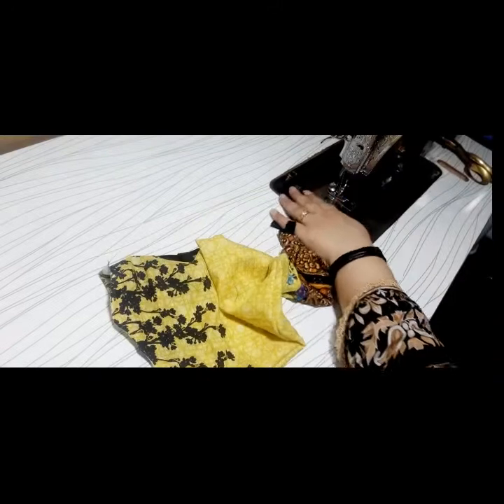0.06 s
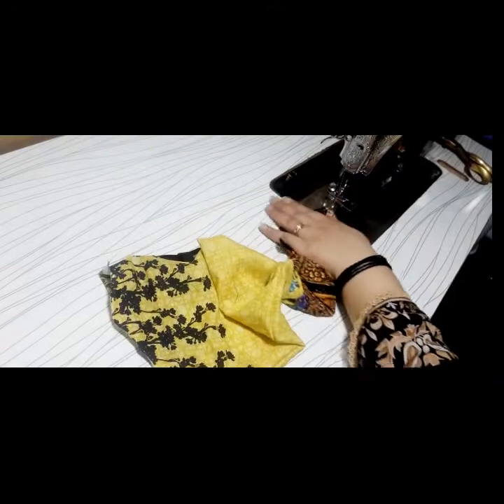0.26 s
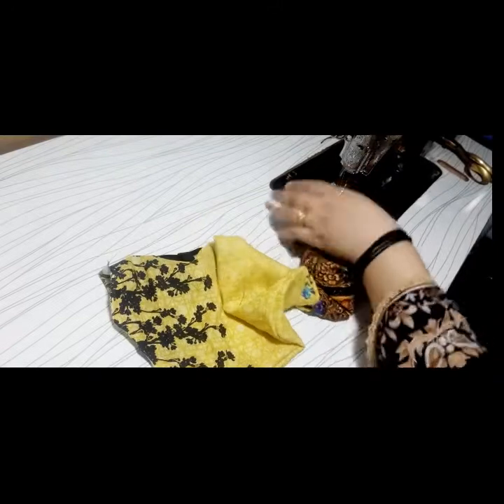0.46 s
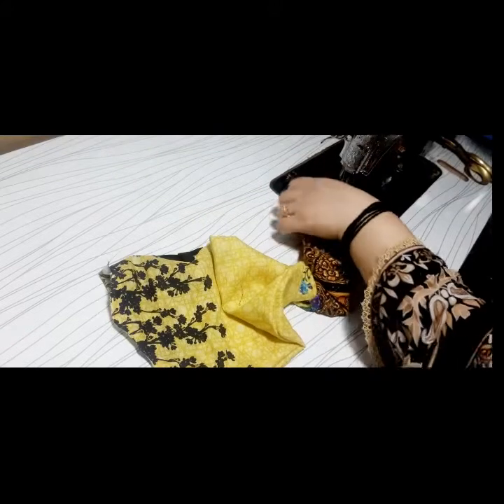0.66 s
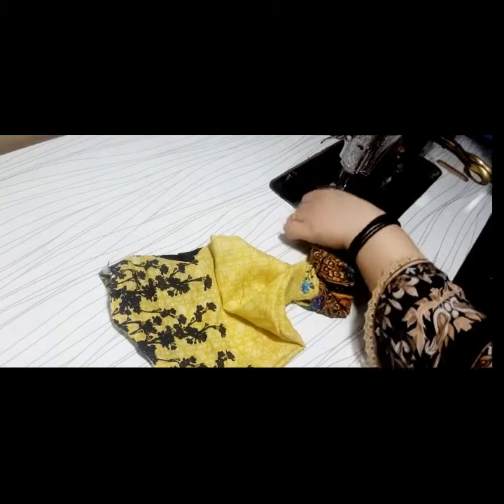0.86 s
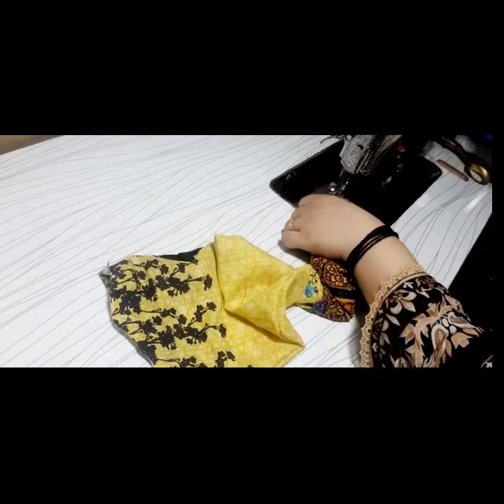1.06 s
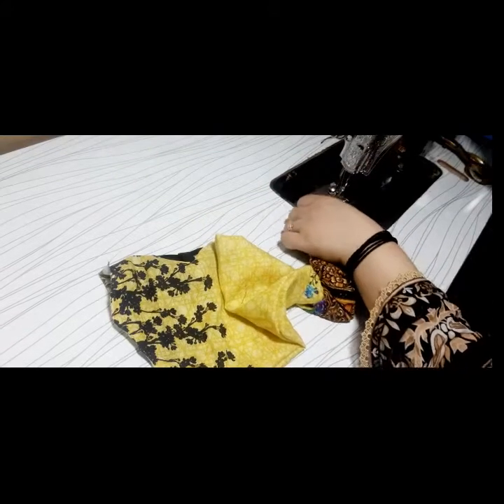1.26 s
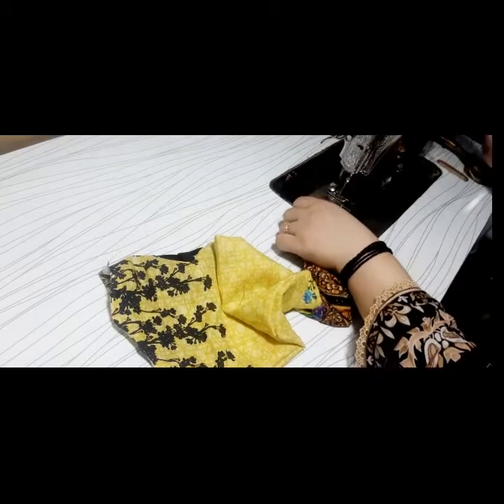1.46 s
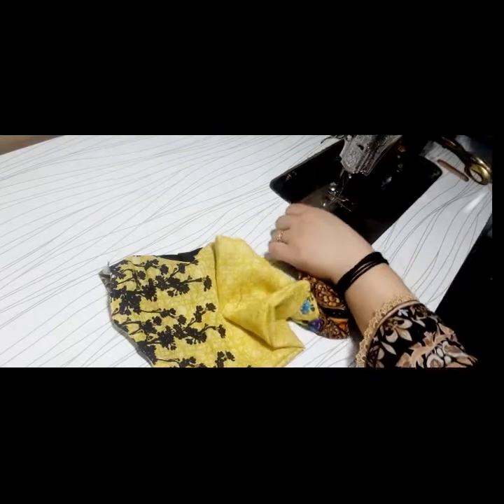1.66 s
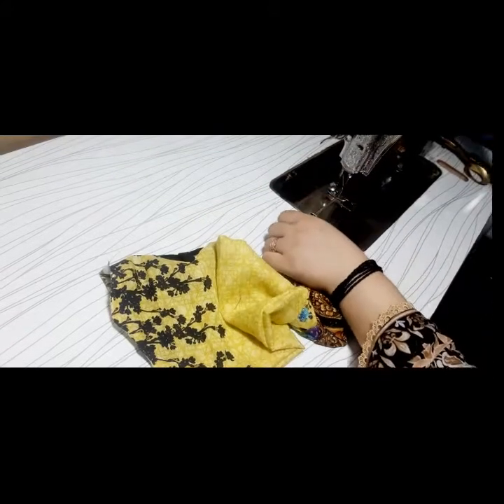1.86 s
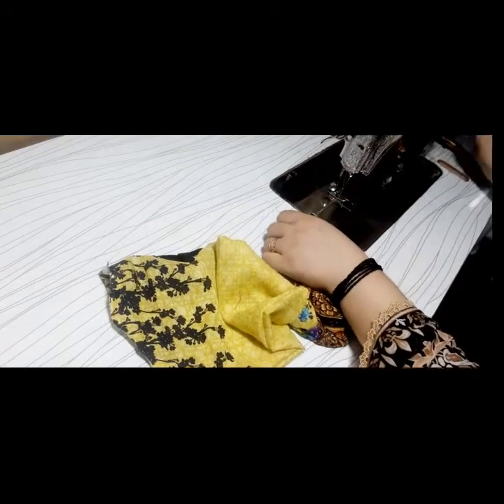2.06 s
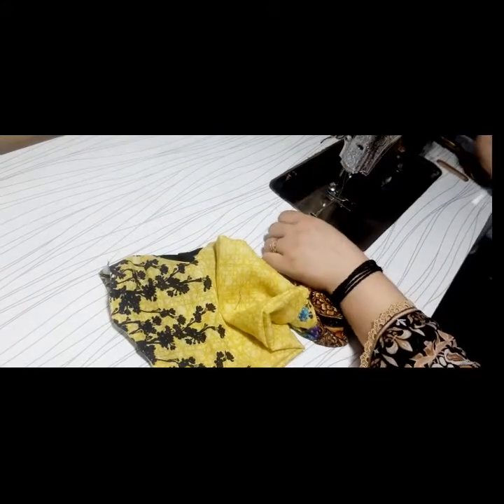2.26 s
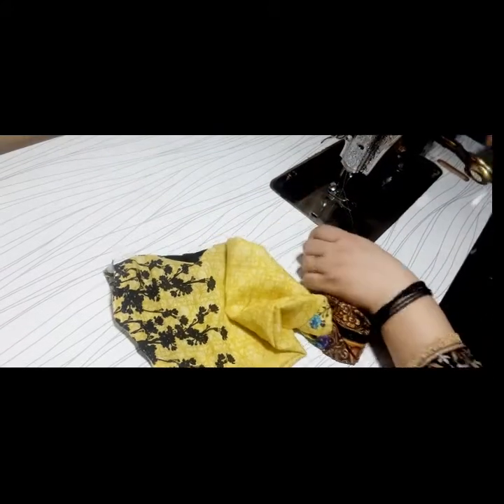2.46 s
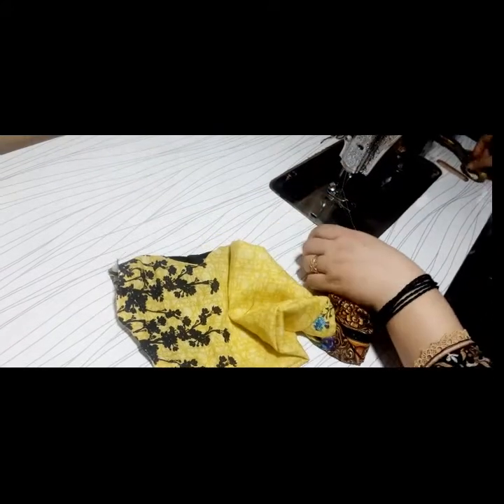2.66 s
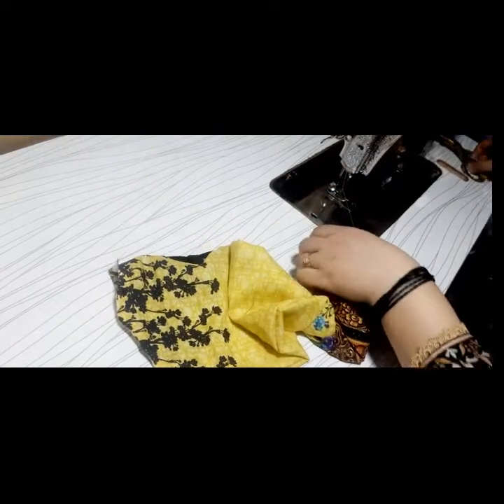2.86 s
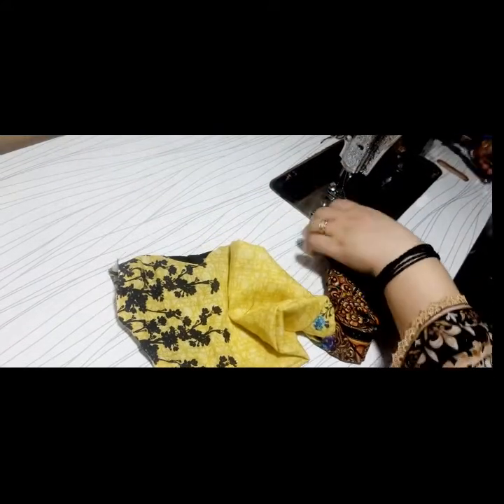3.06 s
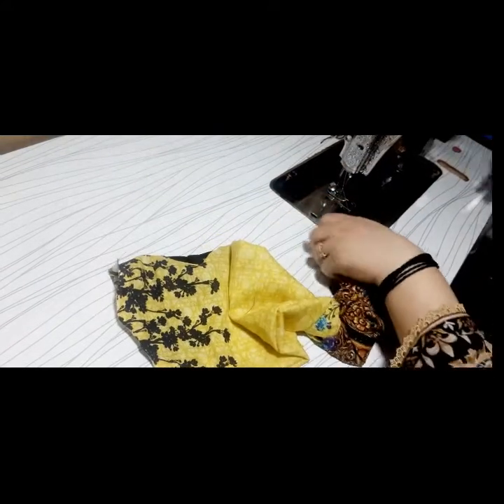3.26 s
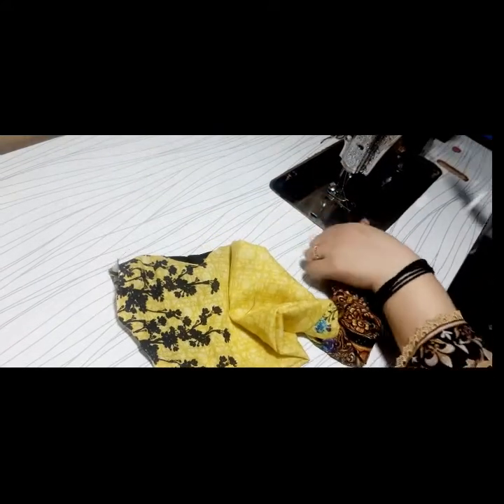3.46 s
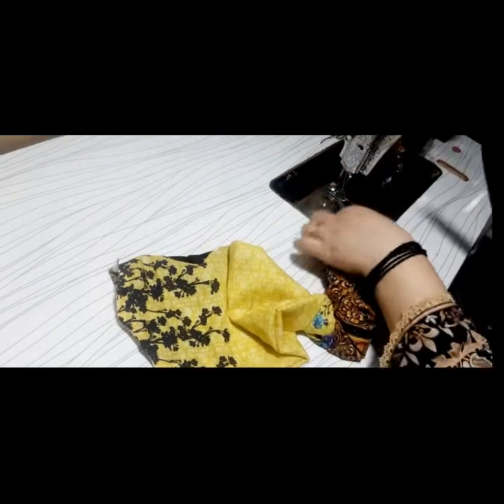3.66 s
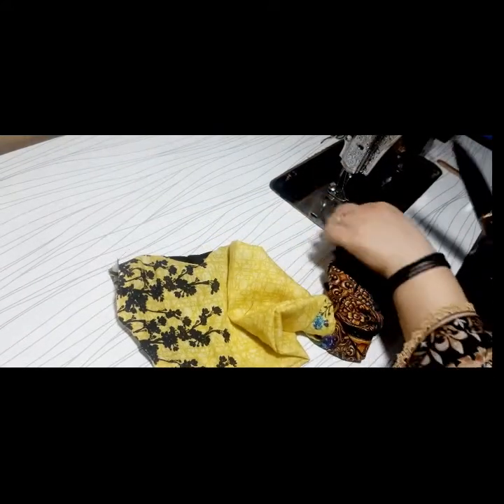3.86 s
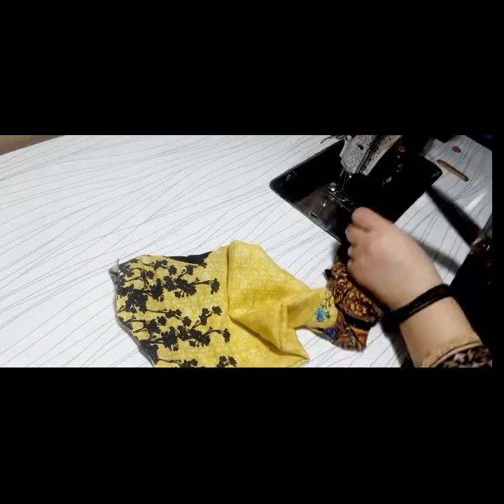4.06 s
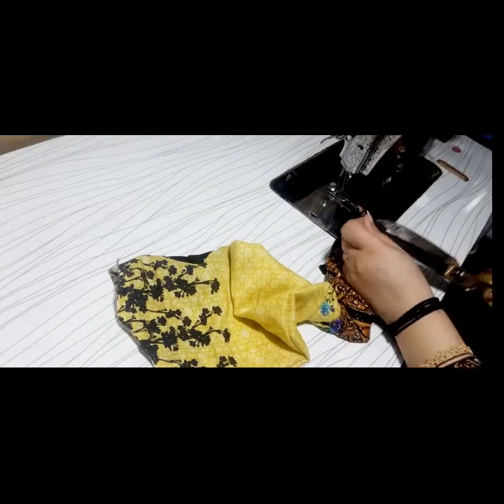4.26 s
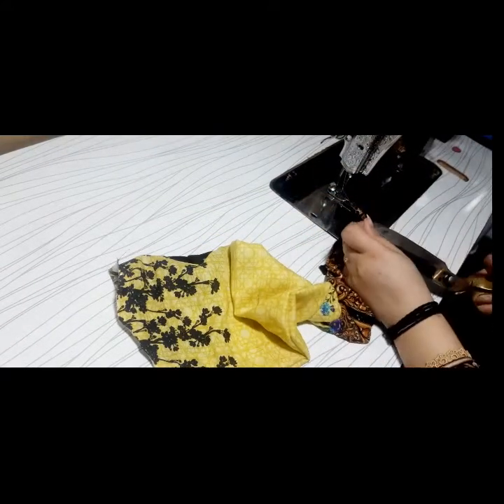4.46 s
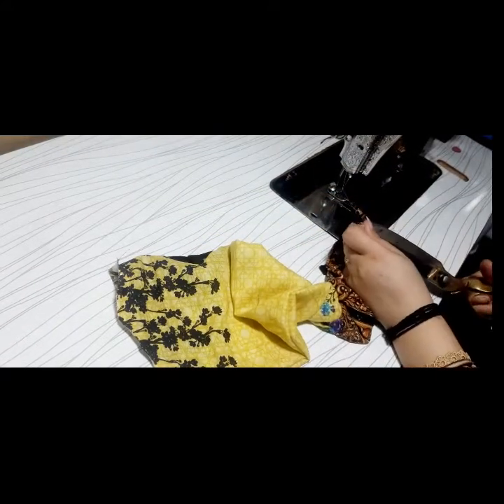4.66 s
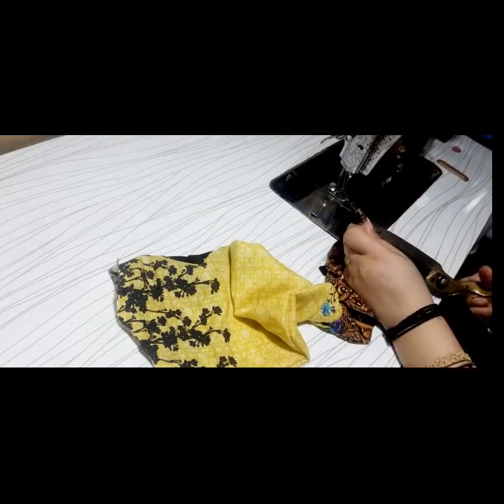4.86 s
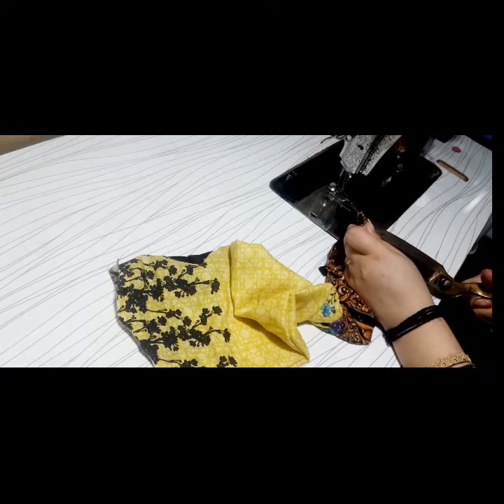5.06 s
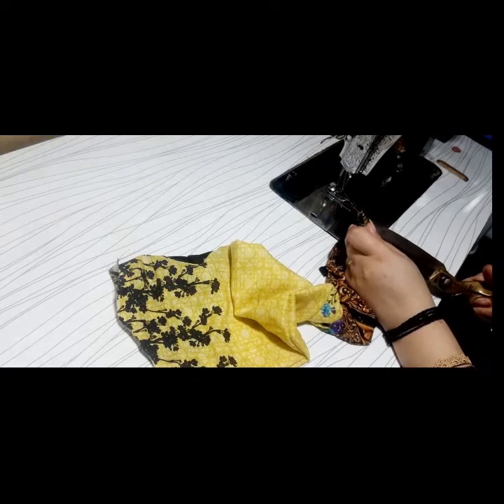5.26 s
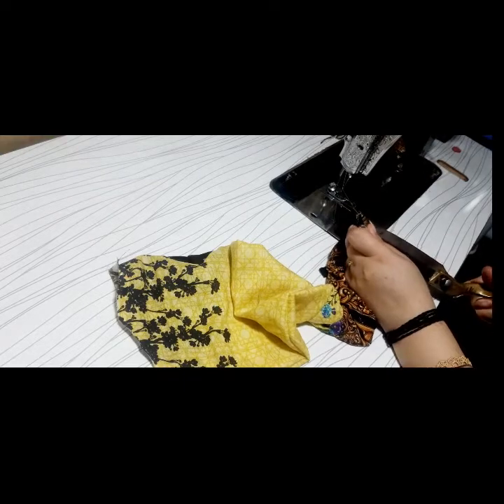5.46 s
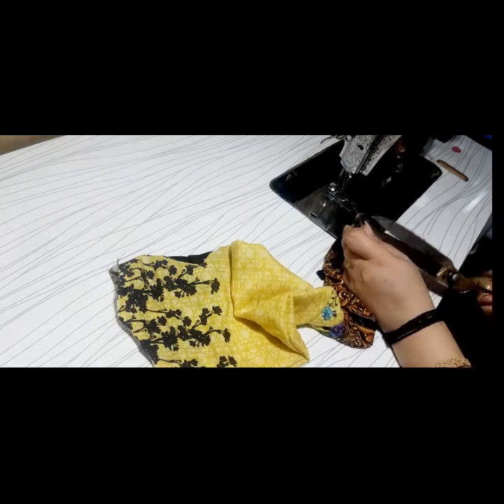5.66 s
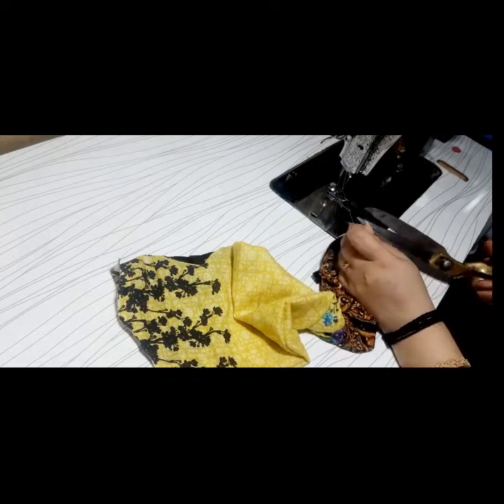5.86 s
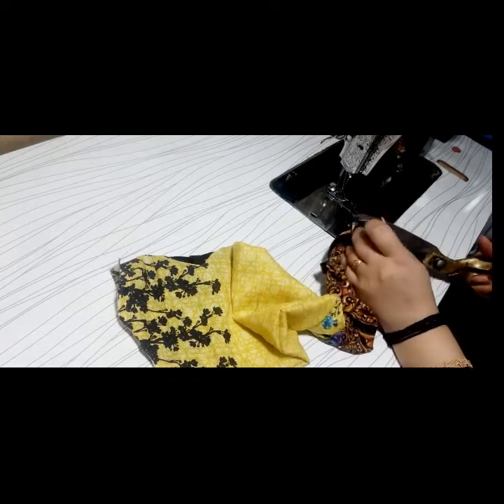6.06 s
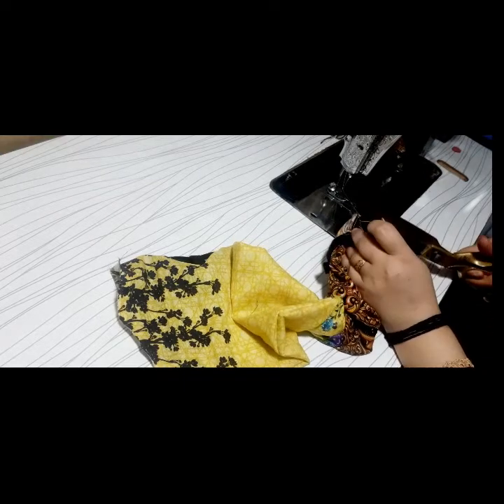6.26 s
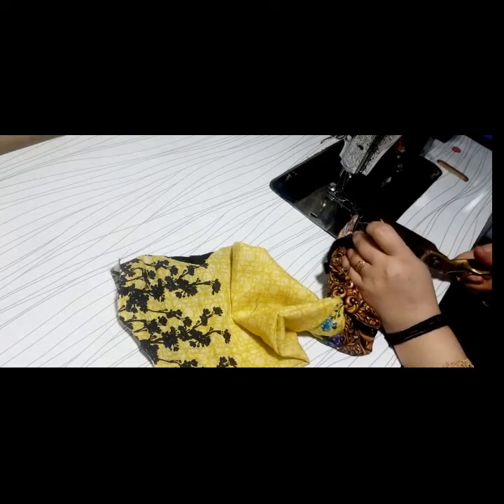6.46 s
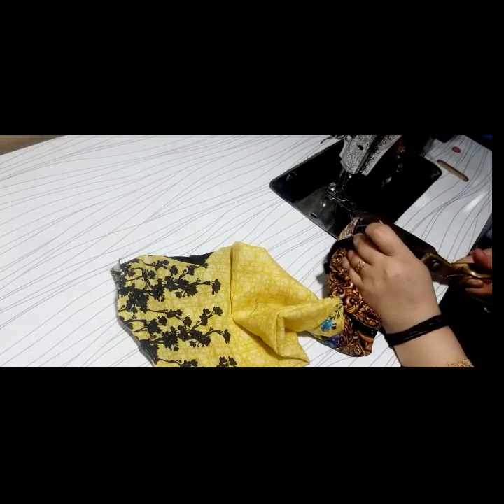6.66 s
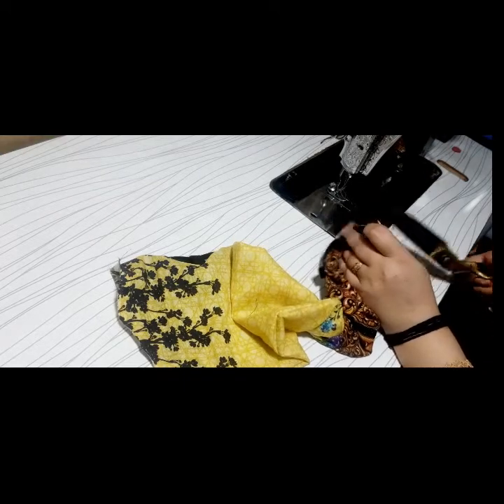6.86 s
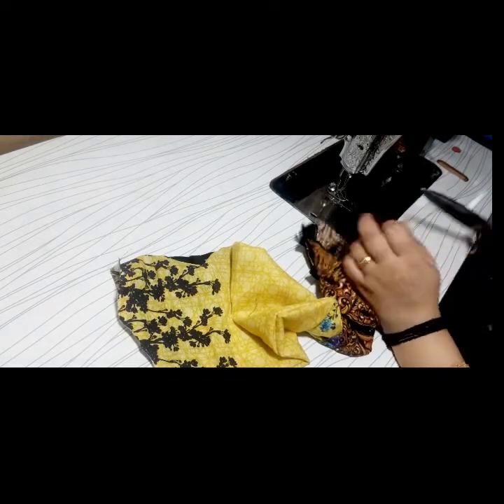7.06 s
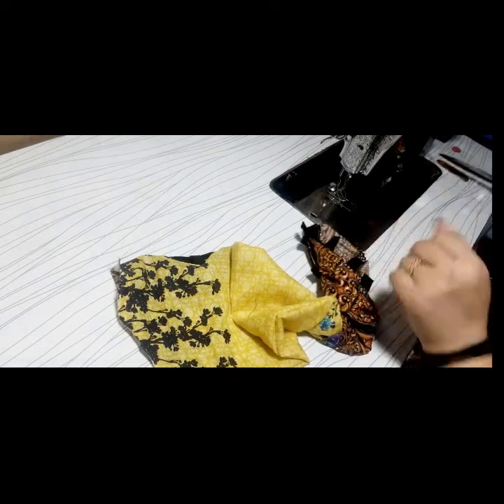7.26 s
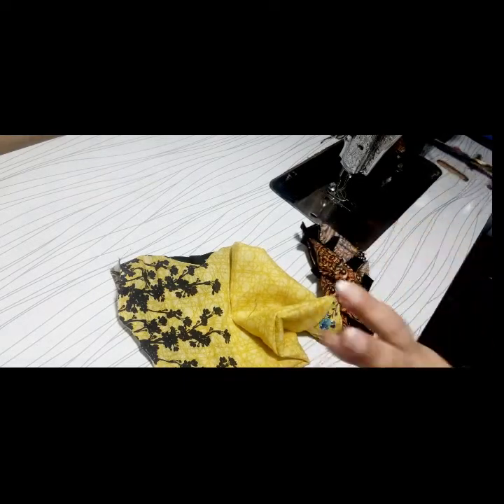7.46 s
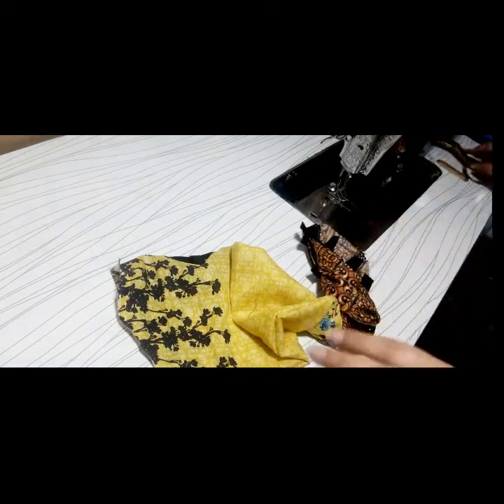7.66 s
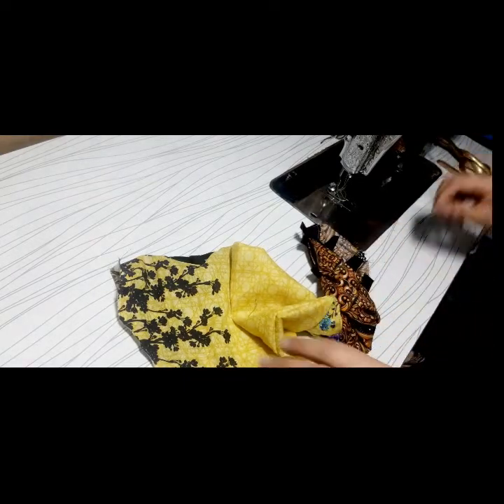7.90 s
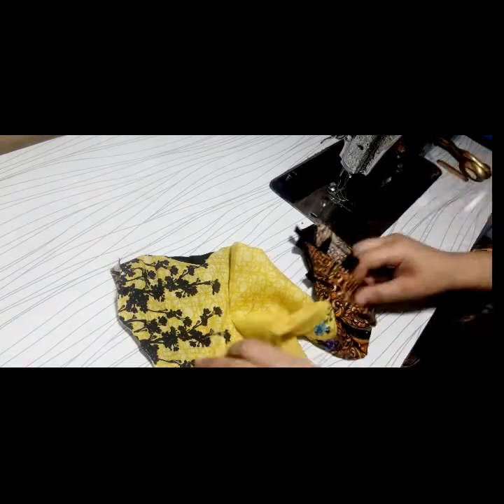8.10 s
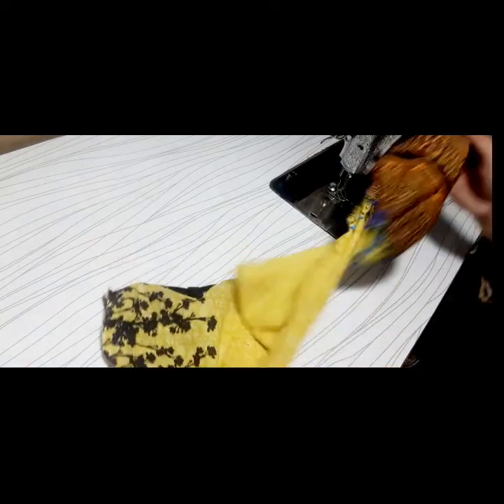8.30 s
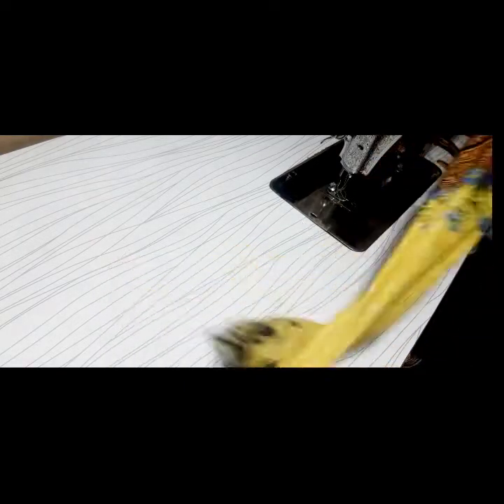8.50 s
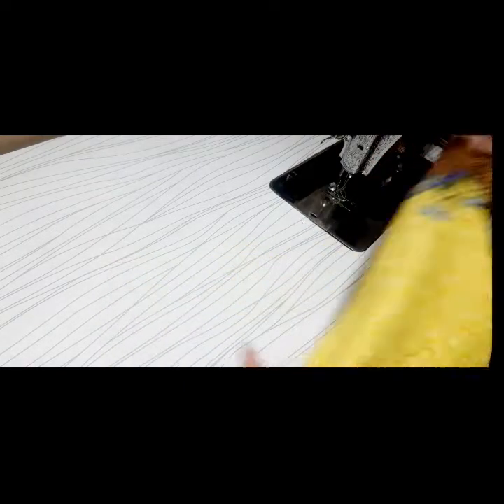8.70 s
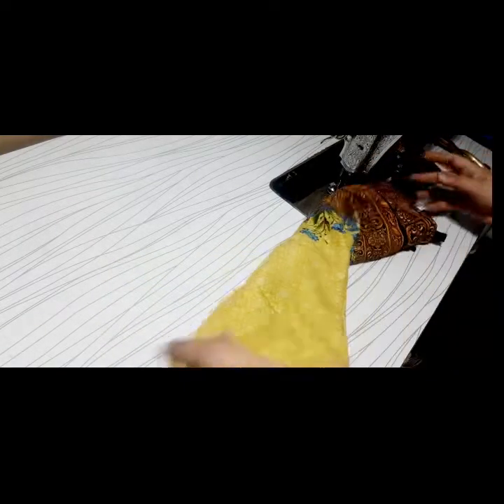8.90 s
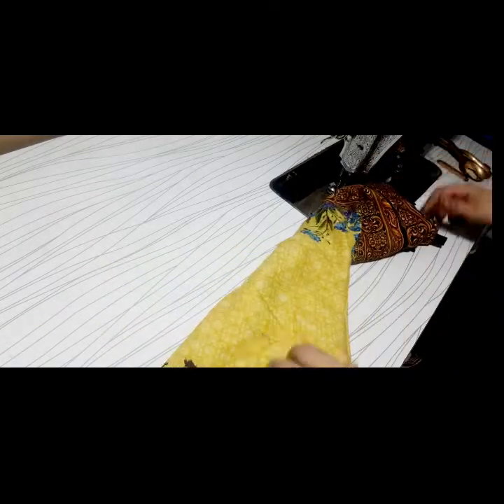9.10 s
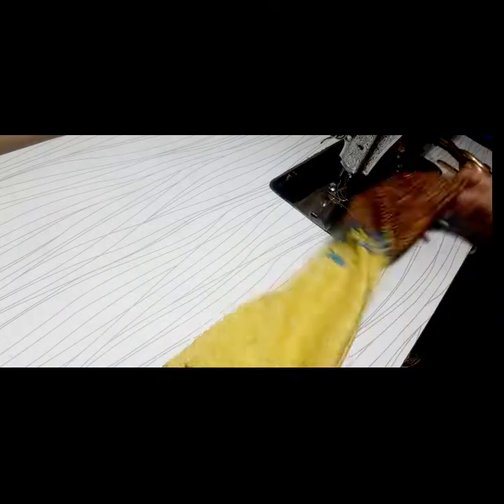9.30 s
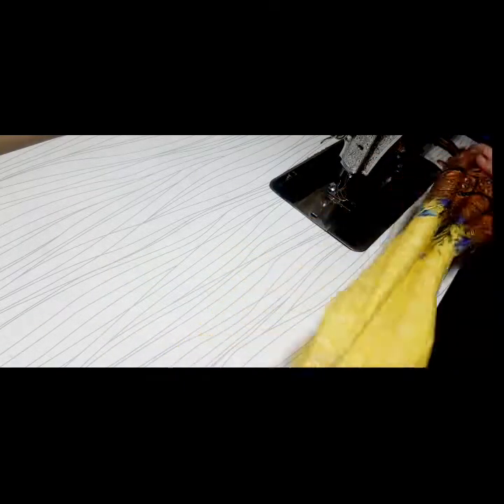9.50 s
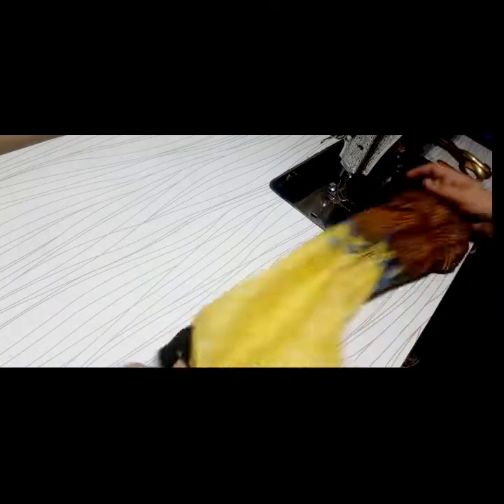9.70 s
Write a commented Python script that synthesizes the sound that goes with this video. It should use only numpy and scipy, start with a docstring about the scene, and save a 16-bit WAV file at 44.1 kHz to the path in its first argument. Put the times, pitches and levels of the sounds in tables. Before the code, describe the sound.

For the first two seconds, hands quietly slide cloth across a sewing table, with light finger taps and tiny bangle clinks. After a soft knock at 2.3 seconds, heavy scissors are picked up around 2.7 to 2.9 seconds with a quick clatter and a brief squeaky scrape. Close to the microphone, the blades make short, gritty metallic strokes at about 4.1 seconds and between 5.1 and 5.7, then cut thread with a crisp, briefly ringing snip at 6.7. From 7.4 to 7.8 seconds the scissors are put down in three knocks; the middle one is the loudest sound and rings the tabletop. Soft cloth sliding, a few taps and faint clinks continue until nearly ten seconds. Throughout, the small room hums faintly, and a very faint, thin high whine throbs about ten times a second.

```python
"""Heavy tailor's scissors, close to the microphone at a sewing table in a small room, in mono.
They are picked up, snip thread with grinding, briefly ringing blades, and are put down with a knock
that rings the table top. Around them hands slide cloth, fingers tap and bangles clink.
Behind it all the room hums faintly and a thin high whine throbs about ten times a second."""
import sys
import numpy as np
from scipy import signal
from scipy.io import wavfile

SR = 44100
rng = np.random.default_rng(int(sys.argv[2]) if len(sys.argv) > 2 else 0)


def to_wav(s):
    """Save 16-bit WAV."""
    ch = np.atleast_2d(s).T  # columns
    pcm = np.round(np.clip(ch, -1, 1) * 32767)  # PCM
    wavfile.write(sys.argv[1], SR, pcm.astype(np.int16))


N = 429534
CLOCK = np.arange(N) / SR
RING = np.arange(SR // 2) / SR  # time since a blow


def amp(db):
    """Decibels to gain."""
    return 10 ** (np.asarray(db) / 20)


def unit_rms(x):
    """Scales to rms 1."""
    return x / np.sqrt(np.mean(x ** 2) + 1e-20)


def blow(x):
    """Scales a short sound to the energy of 10 ms at rms 1."""
    return x * np.sqrt(SR / 100 / np.sum(x ** 2))


def read(points, hz):
    """Reads a curve on a log-frequency axis."""
    f, value = np.transpose(points)
    return np.interp(np.log(hz + 1), np.log(f), value)


def colour(x, points, tilt_db=0, size=8192):
    """Causal filter with the given spectrum, tilted by tilt_db per octave above 500 Hz."""
    hz = abs(np.fft.fftfreq(size, 1 / SR))
    log_gain = np.log(amp(read(points, hz) + tilt_db * np.log2(np.maximum(hz, 500))))
    impulse = np.fft.ifft(np.exp(np.conj(signal.hilbert(log_gain)))).real  # minimum phase
    return signal.oaconvolve(x, impulse[:size // 2])[:len(x)]


def noise(spectrum):
    """Steady coloured noise of rms 1."""
    return unit_rms(colour(rng.standard_normal(N), spectrum))


def bell(s, half_s):
    """A smooth swell at time s, down to 1/e at half_s either side."""
    return np.exp(-((CLOCK - s) / half_s) ** 2)


def drift(per_s):
    """Random wander of rms 1, with per_s turning points a second."""
    knots = rng.standard_normal(1000)
    return unit_rms(np.interp(CLOCK * per_s, np.arange(len(knots)), knots))


def dying(t60):
    """Decay by 60 dB in t60 seconds."""
    return amp(-60 * RING / t60)


def contact(t60, chatter, bite=0.96):
    """One sharp impulse, a millisecond of hard biting, then a dying chatter of tiny contacts."""
    first, later = rng.standard_normal((2, len(RING)))
    impulse = blow(1. * (RING == 0))
    return impulse + bite * blow(first * dying(0.0027)) + chatter * blow(later * dying(t60))


# the room's low noise and the hiss above it: f/Hz, density/dB
AIR_SPECTRUM = [(20, -29.5), (33, -34), (48, -0.5), (80, -7), (170, -7.5), (235, -4.5), (290, 9),
                (345, -2.5), (410, 2.5), (480, -2.5), (970, -4.5), (1250, -11.5), (1550, -12),
                (2000, -24.5), (3200, -48), (16000, -55.5)]
HISS_SPECTRUM = [(3000, 3), (5300, 1.5), (6800, 7), (8000, 4), (12000, 1), (15500, 2.5)]
# hum lines in the room: f/Hz, level/dB
HUM_LINES = [(140, -76), (199.2, -75.5), (279.6, -71.5), (299, -73), (398.6, -68.5), (559.5, -70),
             (748, -74), (966, -74), (1497, -82.5), (5416, -94.5), (10831, -98.5)]


def room_tone(air_db=-59, hiss_db=-71.5, waver_db=1.0, wander_cycles=0.2):
    """All around the microphone: steady noise, an even hiss and a wavering hum."""
    out = amp(air_db) * noise(AIR_SPECTRUM) + amp(hiss_db) * noise(HISS_SPECTRUM)
    for hz, db in HUM_LINES:
        level = np.sqrt(2) * amp(db + waver_db * drift(6.4))
        out += level * np.sin(2 * np.pi * (hz * CLOCK + wander_cycles * drift(6)))
    return out


# narrow noise band around the whine: f/Hz, density/dB
WHINE_BAND = [(5000, -31), (6900, -26.5), (7200, -11), (7320, 3.5), (7480, -5.5), (7570, 0), (7720, -41.5),
              (9000, -32)]


def whine(band_db=-80, tone_db=-81, hz=7370, wander_hz=120, throbs_per_s=9.932, depth_db=15.5):
    """Faint in the background, an unsteady tone in noise; each throb swells fast and fades slower."""
    rise, peak_at = 0.23, 0.9  # shares of a cycle
    since_peak = (throbs_per_s * CLOCK - peak_at) % 1
    dip = np.minimum(since_peak / (1 - rise), (1 - since_peak) / rise)
    throb = unit_rms(amp(-depth_db * dip))
    tone = np.sqrt(2) * np.sin(2 * np.pi * np.cumsum(hz + wander_hz * drift(100)) / SR)
    return throb * (amp(tone_db) * tone + amp(band_db) * noise(WHINE_BAND))


# decay of the small room: f/Hz, t60/s
ROOM_DECAY = [(100, 0.21), (500, 0.22), (1500, 0.24), (4000, 0.25), (9000, 0.25), (15000, 0.18)]


def reverb(x, build_s=0.03):
    """The near walls return a dense tail that builds quickly, each band dying at its own speed."""
    hz, t, bands = signal.stft(rng.standard_normal(len(RING)), SR, nperseg=256)
    bands *= amp(-60 * t / read(ROOM_DECAY, hz)[:, None])
    tail = signal.istft(bands, SR, nperseg=256)[1][:len(RING)] * (1 - np.exp(-RING / build_s))
    walls = [(120, -5), (330, -3), (560, -9), (1000, -6.5), (2000, -13), (4000, -13), (12000, -18.5)]
    return signal.oaconvolve(x, colour(tail / np.linalg.norm(tail), walls))[:N]


# the forearm shifts on the table: middle t/s, half length/s, level/dB, f/Hz
ARM_SHIFTS = [(0.252, 0.25, -69, 66), (3.88, 0.043, -61.5, 52.5)]


def forearm():
    """Each shift of the arm swells into a dull rumble in the table."""
    out = np.zeros(N)
    for s, half_s, db, hz in ARM_SHIFTS:
        rumble = noise([(hz / 2, -22), (hz, 0), (hz * 2, -12), (hz * 10, -60)])
        out += amp(db) * bell(s, half_s) * rumble
    return out


# the hand pushes cloth across the table: middle t/s, length/s, level/dB
CLOTH_PUSHES = [(0.282, 0.59, -58), (.95, 0.37, -62), (1.34, 0.65, -63), (1.88, 0.27, -65),
                (2.21, 0.29, -64.5), (2.384, 0.22, -64.5), (2.755, 0.62, -62.5), (3.883, 0.39, -67),
                (6.967, 0.25, -64), (7.95, 1, -65), (9.617, 0.5, -66.5)]


def rubbing(resting_db=-79):
    """Strength of the rub: each push speeds up and slows down, over the rustle of a resting hand."""
    power = sum((amp(db) * bell(s, length / 2)) ** 2 for s, length, db in CLOTH_PUSHES)
    return np.sqrt(amp(resting_db) ** 2 + power)


# cloth on the table top: f/Hz, density/dB
CLOTH_SPECTRUM = [(30, -7.5), (100, 13.5), (300, 4), (700, 5.5), (1150, 1.5), (1500, 6), (1750, -2.5),
                  (2080, -2), (2430, 2.5), (2850, -12), (3500, -12), (4500, -9.5), (7000, -31.5),
                  (16000, -27)]


def cloth(rub, flutter_db=2.0):
    """Cloth slides over the table with uneven friction."""
    return noise(CLOTH_SPECTRUM) * rub * amp(flutter_db * drift(35))


# fingers, bangles and scissor handles tap the table: t/s, level/dB, tilt/(dB/octave)
LIGHT_TAPS = [(.657, -55, -6), (.789, -58, -5), (1.339, -51.5, 0), (1.505, -53.5, -3.5), (1.801, -51, -3),
              (2.126, -55, -1), (2.8615, -43.5, -4.5), (6.727, -50.5, -14.5), (6.778, -57.5, -1.5),
              (7.847, -56.5, -6), (7.9007, -52.5, -4.5), (9.1286, -52.5, -4)]
# one tap: f/Hz, density/dB
TAP_SPECTRUM = [(40, -19), (150, 1), (600, -2.5), (1150, 3.5), (1550, 3), (2100, -6.5), (2800, -0.5),
                (3700, -2.5), (5000, -17), (9000, -17), (15000, -11)]


def taps(rub, t60=.038, chatter=1.8, touches_per_s=4, touch_db=-64, moving_db=-68):
    """Light taps, all damped alike by the hand; fainter touches come by chance while it moves."""
    touches = (rng.random(N) < touches_per_s / SR) * (rub > amp(moving_db)) * amp(touch_db)
    out = signal.oaconvolve(touches, blow(colour(contact(t60, chatter), TAP_SPECTRUM)))[:N]
    for s, db, tilt_db in LIGHT_TAPS:
        add_at(out, s, amp(db) * blow(colour(contact(t60, chatter), TAP_SPECTRUM, tilt_db)))
    return out


def add_at(mix, s, sound):
    """Mixes a sound in at time s."""
    part = mix[max(round(s * SR), 0):][:len(sound)]
    part += sound[:len(part)]


# bangles and small steel parts at the table: t/s, level/dB, lowest mode f/Hz, t60/s
METAL_CLINKS = [(.978, -58.5, 3550, 0.22), (1.007, -59, 5400, 0.066), (2.126, -74, 8200, .03),
                (2.143, -64.5, 8160, 0.024), (2.408, -57.5, 3760, 0.13), (2.413, -58, 2410, 0.13),
                (2.581, -63.5, 7800, 0.049), (8.247, -57, 4673, 0.18), (9.1302, -53.5, 5630, 0.017)]
# their modes: f/lowest mode, level/dB
METAL_MODES = [(1, 9.5), (1.129, 3.5), (1.31, 0.5), (1.62, -8), (1.9, -6)]
# their rattle: f/lowest mode, density/dB
RATTLE_SPECTRUM = [(.25, -25), (.47, -3), (1, 0), (1.5, -4), (3, -13)]


def clinks(rattle_db=-1, pair_spread=.012):
    """A brief rattle sets a few thin metal modes ringing in close, beating pairs."""
    out = np.zeros(N)
    for s, db, hz, t60 in METAL_CLINKS:
        pairs = 1 + pair_spread * rng.standard_normal((len(METAL_MODES), 2))
        ring = sum(amp(level) * np.sin(2 * np.pi * ratio * hz * detune * RING)
                   for (ratio, level), pair in zip(METAL_MODES, pairs) for detune in pair)
        spectrum = [(hz * ratio, level) for ratio, level in RATTLE_SPECTRUM]
        rattle = colour(contact(t60=.08, chatter=2.2), spectrum)
        add_at(out, s, amp(db) * blow(blow(ring * dying(t60)) + amp(rattle_db) * blow(rattle)))
    return out


# the scissor tips scrape and squeak on the table: f/Hz, density/dB
SCRAPE_SPECTRUM = [(40, -39), (150, -17), (550, -5), (900, 6.5), (1200, -6), (1900, -1), (3000, -11),
                   (3900, -2), (5000, -15), (12000, -21), (16000, -30)]
SQUEAK_SPECTRUM = [(5000, -19), (7800, -20), (8400, -6), (9000, 1), (9600, -24), (11500, -7), (12500, -2),
                   (13400, -12), (14500, -17)]


def tip_drag(scrape_db=-42, squeak_db=-39):
    """As the scissors are lifted the tips scrape the table, then squeak as they leave it."""
    scrape = amp(scrape_db) * bell(s=2.843, half_s=0.0072) * noise(SCRAPE_SPECTRUM)
    squeak = amp(squeak_db) * bell(s=2.8503, half_s=0.0029) * noise(SQUEAK_SPECTRUM)
    return scrape + squeak


# the scissors knock on the table:
# t/s, top level/dB, top tilt/(dB/octave), crack level/dB, crack tilt/(dB/octave), thump level/dB
TABLE_KNOCKS = [(2.284, -46, -5, -51, -15, -48), (2.7041, -40, 0, -46, 6, -52),
                (2.7803, -33.5, -4, -38.5, -3, -40), (2.861, -42.5, -0.5, -41, -2, -48),
                (2.9151, -35, -0.5, -48, -4, -47), (7.4421, -30.5, -1.5, -38.5, -4.5, -38),
                (7.5988, -19, 1.5, -25.5, 0.5, -32.5), (7.7507, -35.5, -6, -48.5, -3, -60),
                (8.064, -49, -7.5, -60, -8, -49.5)]
# main modes of the table top: f/Hz, level/dB, t60/s
TOP_MODES = [(302, -20, 0.15), (401, -9.5, 0.094), (459, -12, 0.11), (543.3, 5.5, 0.061),
             (590, -5.5, 0.039), (676, -20, 0.1), (772.5, -5, 0.092), (955, -15.5, 0.13),
             (1265, -23.5, 0.092), (1510, -13.5, 0.105), (1528, 1, 0.009), (1695, -13, 0.085),
             (1710, -24.5, 0.086)]
# its crowd of weaker modes, and the crack of steel on it: f/Hz, density/dB
WOOD_SPECTRUM = [(60, -13.5), (180, -4), (250, -10), (400, -10), (560, 8), (800, 2.5), (1000, -2),
                 (1400, -1), (2100, -11.5), (4000, -26), (8000, -25.5), (16000, -34.5)]
CRACK_SPECTRUM = [(200, -18.5), (900, -1), (1900, -3.5), (2550, -10), (3400, 2), (4400, -4), (6000, -9),
                  (7500, -14), (9000, -7.5), (10500, -15), (12500, -9.5), (15500, -11.5)]


def knocks(wood_db=-4, modes_db=-5.5, rise_s=0.0028):
    """Steel cracks on the table top and the board rings."""
    out = np.zeros(N)
    onset = 1 - np.exp(-RING / rise_s)
    for s, top_db, top_tilt_db, crack_db, crack_tilt_db, _ in TABLE_KNOCKS:
        # the downward tilt of softer blows leaves the higher modes weak
        modes = sum(amp(db + top_tilt_db * np.log2(max(hz / 600, 1)))
                    * dying(t60) * np.sin(2 * np.pi * hz * RING) for hz, db, t60 in TOP_MODES)
        wood = colour(rng.standard_normal(len(RING)) * dying(0.075), WOOD_SPECTRUM, top_tilt_db)
        board = amp(modes_db) * blow(modes * onset) + amp(wood_db) * blow(wood * onset)
        crack = colour(contact(t60=0.028, chatter=1.5, bite=1.3), CRACK_SPECTRUM, crack_tilt_db)
        add_at(out, s, amp(top_db) * board - amp(crack_db) * blow(crack))
    return out


def thumps(hz=110, swell_s=.027, echo_s=.045, echo_gain=0.51):
    """With each knock the whole table swings up slowly in a low thump, which the walls return once."""
    out = np.zeros(N)
    swell = (RING / swell_s * np.exp(1 - RING / swell_s)) ** 4
    thump = swell * np.sin(2 * np.pi * hz * RING)
    echo = echo_gain * np.interp(RING - echo_s, RING, thump)
    for s, *_, thump_db in TABLE_KNOCKS:
        add_at(out, s, amp(thump_db) * (thump + echo))
    return out


# resonances of the hand-damped blades: f/Hz, width/Hz, level/dB
BLADE_MODES = [(2840, 210, 3), (3630, 270, 0), (4280, 190, -4.5), (5900, 340, -13), (7030, 104, 4.5),
               (7740, 400, -12), (8000, 370, -5), (10150, 740, -7.5), (14100, 1900, -24)]


def blade_spectrum(grip, valley_db, damping):
    """Resonances, shifted by grip and widened by damping, over a weak broad response with no bass."""
    hz = np.geomspace(50, 20000, 600)
    peaks = sum(amp(db) ** 2 / (1 + 2 * ((hz - f * grip) / (width * damping)) ** 2) ** 2
                for f, width, db in BLADE_MODES)
    broad = amp(valley_db) ** 2 / (1 + (hz / 10500) ** 4)
    bass_loss = 1 + (1200 / hz) ** 4
    return np.c_[hz, 10 * np.log10((peaks + broad) / bass_loss)]


# the blades snap shut near the microphone: t/s, level/dB, tilt/(dB/octave), grip pitch factor
BLADE_SNAPS = [(2.7803, -41.5, -6.5, 1.22), (2.8616, -47, -4, 1.2), (5.4794, -60, -4, 1.17),
               (6.726, -36.5, -4, 1.024), (7.7498, -53, -9, 1.6)]


def snaps():
    """The blades strike each other and ring briefly."""
    out = np.zeros(N)
    for s, db, tilt_db, grip in BLADE_SNAPS:
        strike = contact(t60=.022, chatter=.55, bite=.45)
        ring = colour(strike, blade_spectrum(grip, valley_db=-25, damping=1.3), tilt_db)
        add_at(out, s, amp(db) * blow(ring))
    return out


# the blades slide over each other near the microphone:
# strongest bite t/s, rise/s, fall/s, level/dB, tilt/(dB/octave), grip pitch factor
BLADE_STROKES = [(4.099, .006, 0.0088, -59, 5, 0.92), (4.123, .004, 0.019, -53, 2.5, 1.1),
                 (5.118, .008, 0.011, -70, 0, 1.2), (5.171, 0.011, 0.047, -64.5, -0.5, 1.17),
                 (5.479, 0.004, 0.004, -50, 3, 1.05), (5.64, 0.0033, 0.0067, -48.5, 3, 1.15),
                 (5.651, 0.007, 0.0088, -48, -0.5, 1), (5.70, .03, 0.062, -67.5, -6.5, .9),
                 (6.665, .002, 0.0026, -56, 3, 0.97), (6.688, .007, 0.015, -55, 2, 0.99),
                 (6.7222, 0.0065, 0.0079, -41.5, 1, 0.85)]


def strokes(grit_db=6, slip_db=2.5, slips_per_s=700):
    """The edges grind in fine grains as they stick and slip, exciting the blades' resonances."""
    out = np.zeros(N)
    t = RING - RING[-1] / 2  # zero at the strongest bite
    for s, rise, fall, db, tilt_db, grip in BLADE_STROKES:
        grains = rng.standard_normal(len(t)) * amp(grit_db * rng.standard_normal(len(t)))
        slips = amp(slip_db * np.repeat(rng.standard_normal(len(t)), SR // slips_per_s)[:len(t)])
        pressure = np.exp(np.minimum(t, 0) / rise - np.maximum(t, 0) / fall)
        grind = colour(grains * slips, blade_spectrum(grip, valley_db=-11, damping=.8), tilt_db)
        add_at(out, s + t[0], amp(db) * pressure * unit_rms(grind))
    return out


def scene(blades_wet=0.28):
    """The blades, close to the microphone, stir the room less than the table; both channels alike."""
    rub = rubbing()
    table = knocks() + cloth(rub) + taps(rub) + forearm() + clinks() + tip_drag()
    blades = snaps() + strokes()
    mono = table + thumps() + blades + reverb(table + blades_wet * blades) + room_tone() + whine()
    return np.array([mono, mono])


def record(dry, edge_hz=15650):
    """The recorder's band limit."""
    lowpass = signal.firwin(511, edge_hz, window=("kaiser", 8), fs=SR)
    return signal.oaconvolve(dry, lowpass[None], "same")


dry = scene()
out = record(dry)
to_wav(out)
```